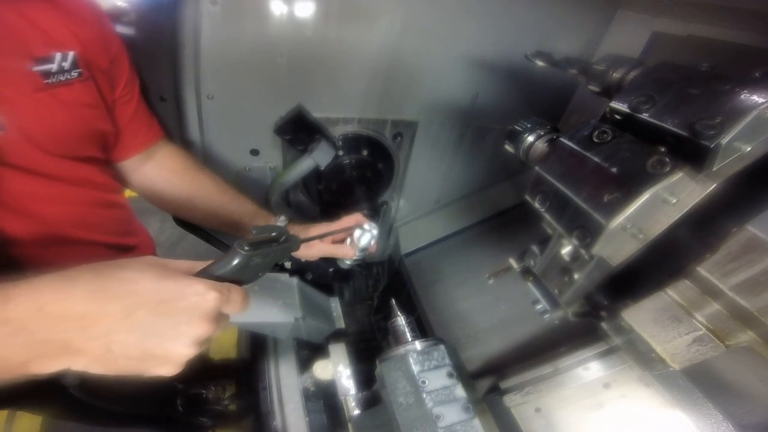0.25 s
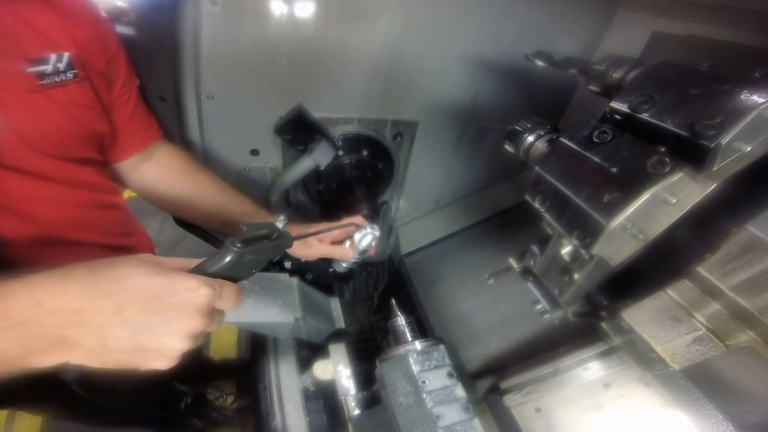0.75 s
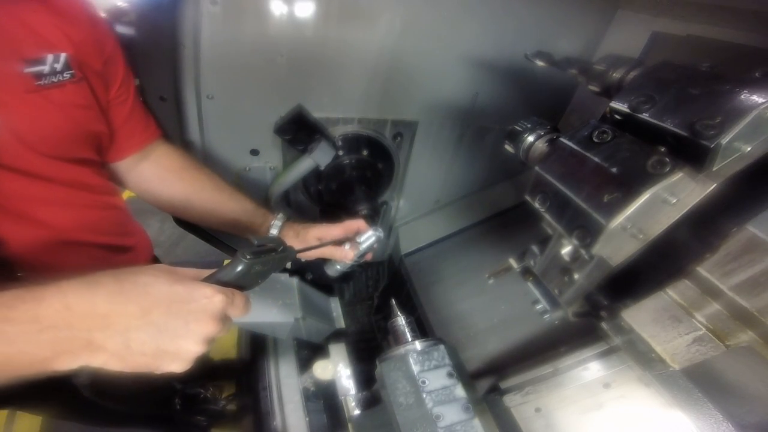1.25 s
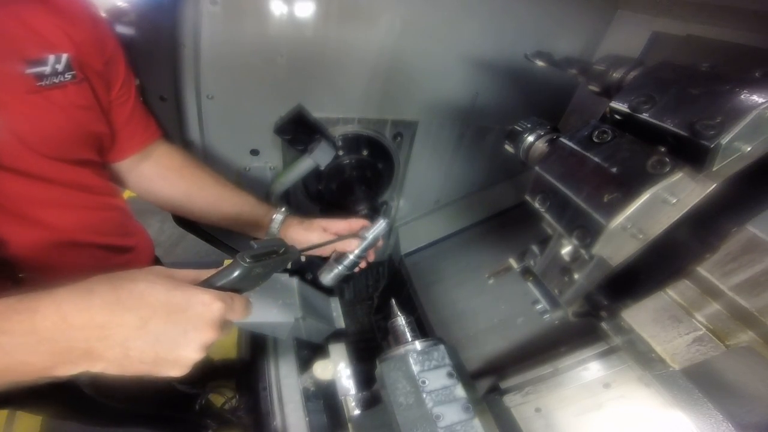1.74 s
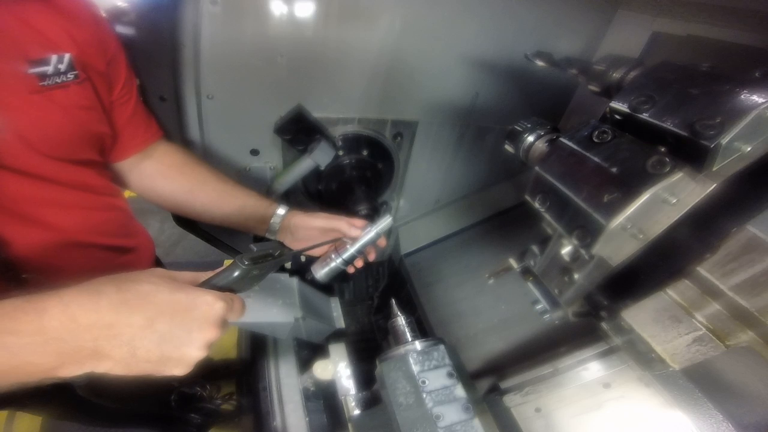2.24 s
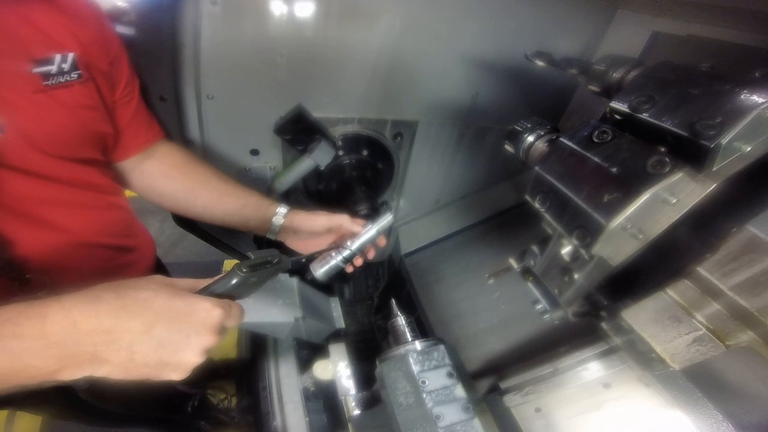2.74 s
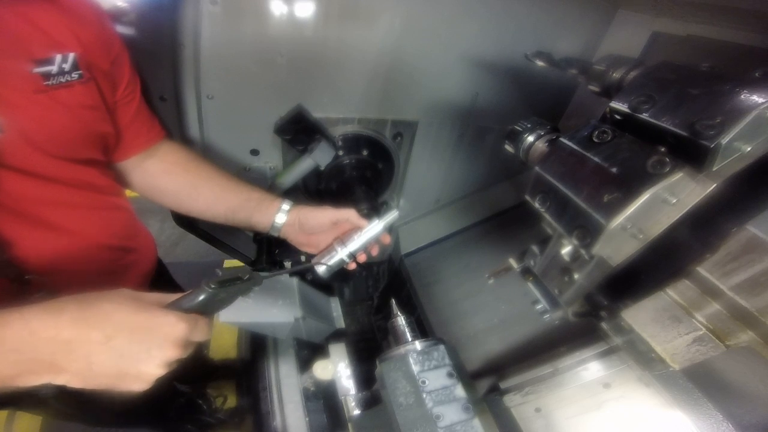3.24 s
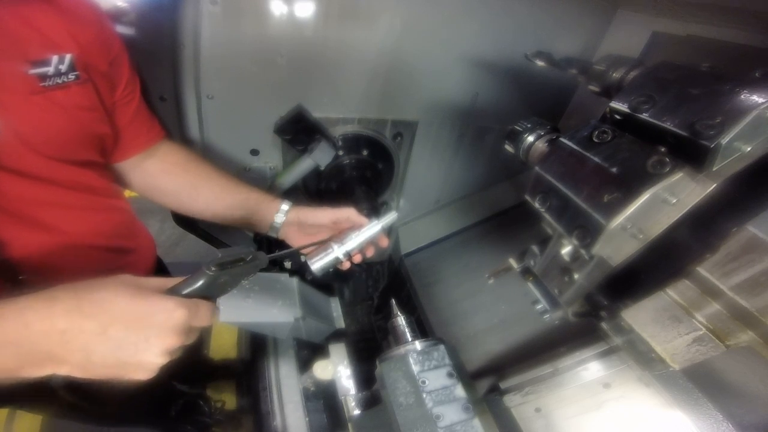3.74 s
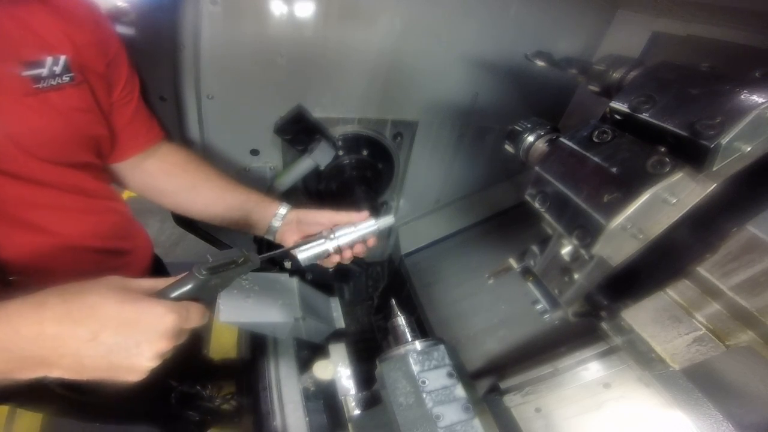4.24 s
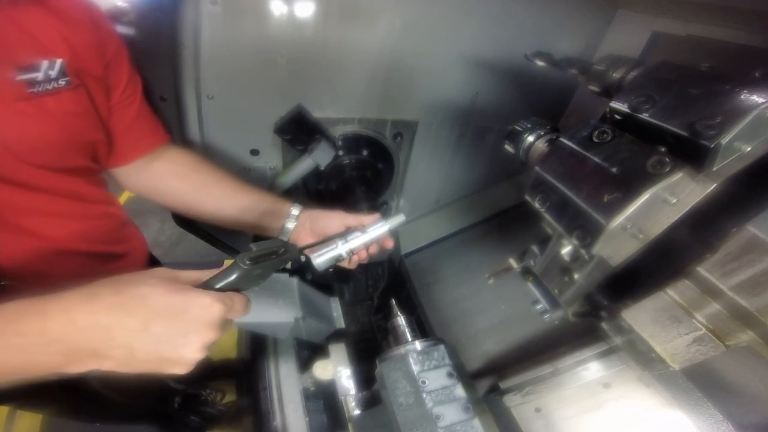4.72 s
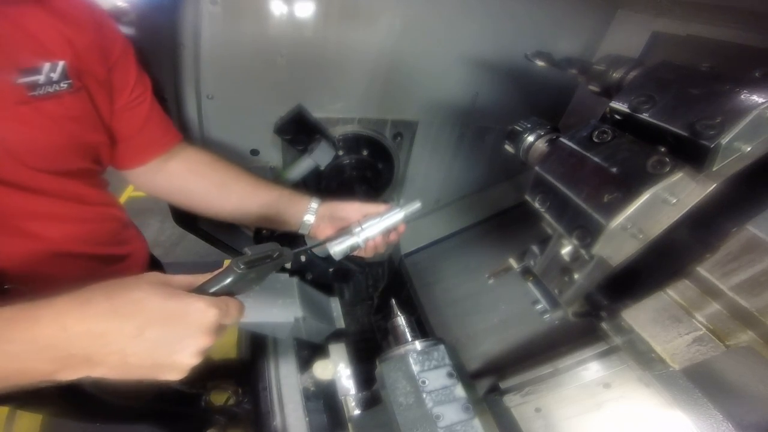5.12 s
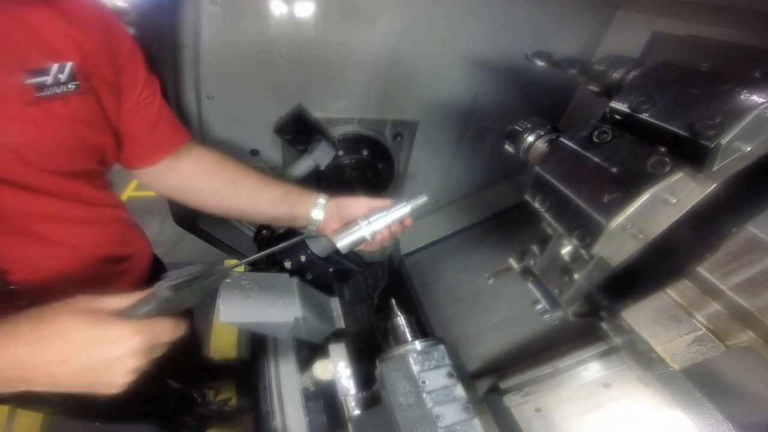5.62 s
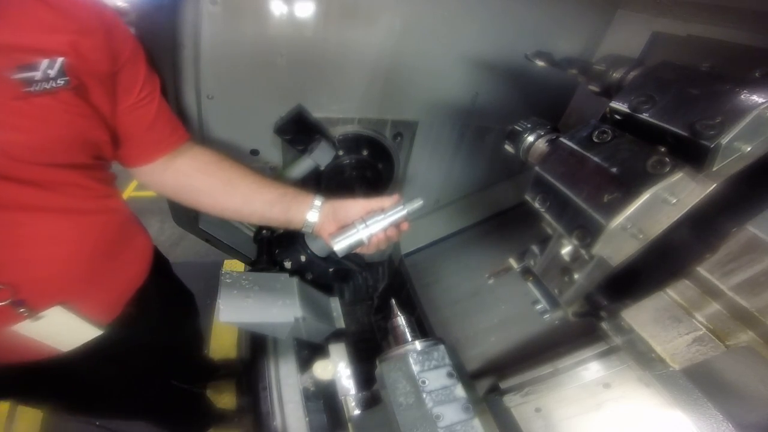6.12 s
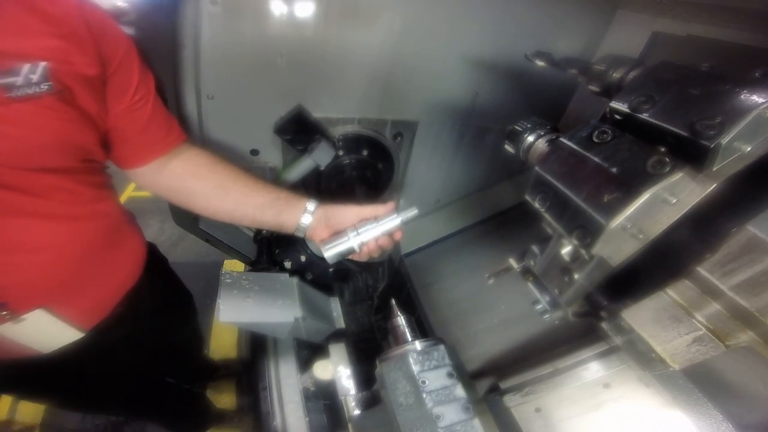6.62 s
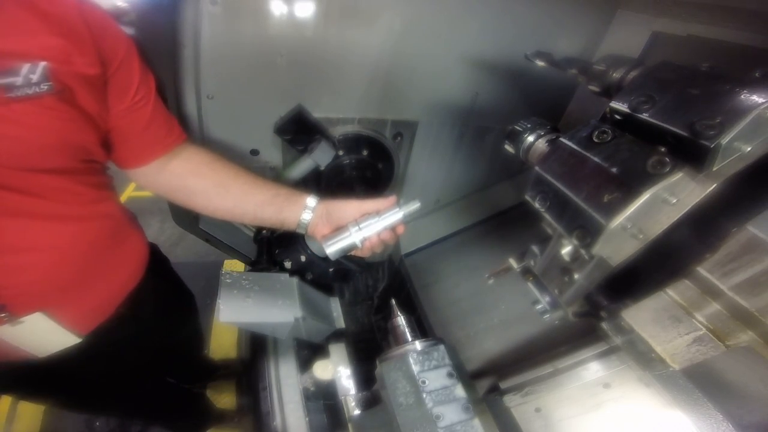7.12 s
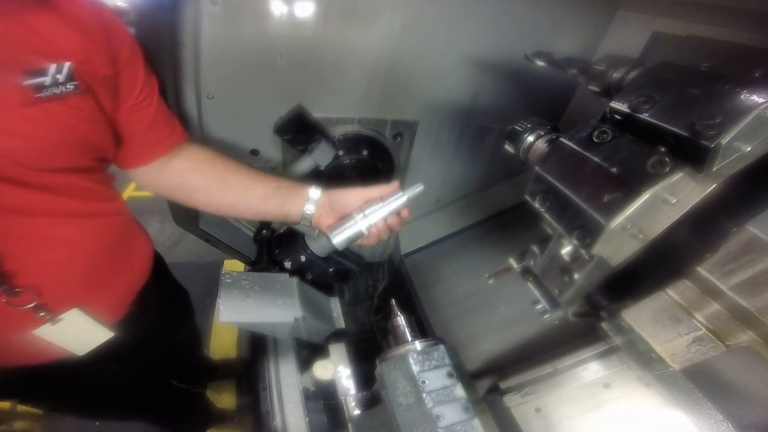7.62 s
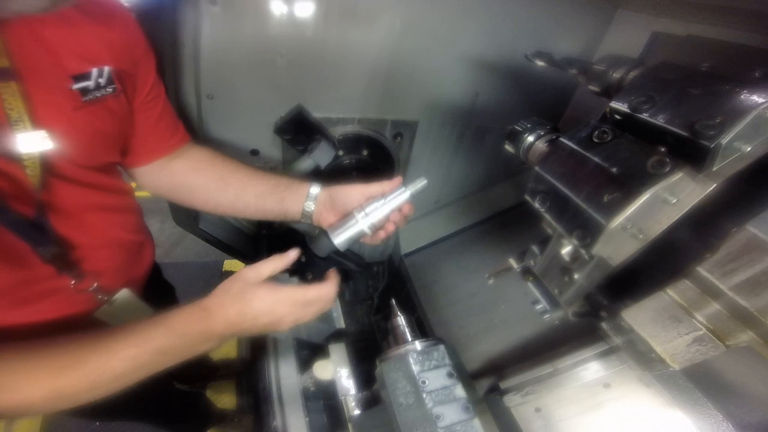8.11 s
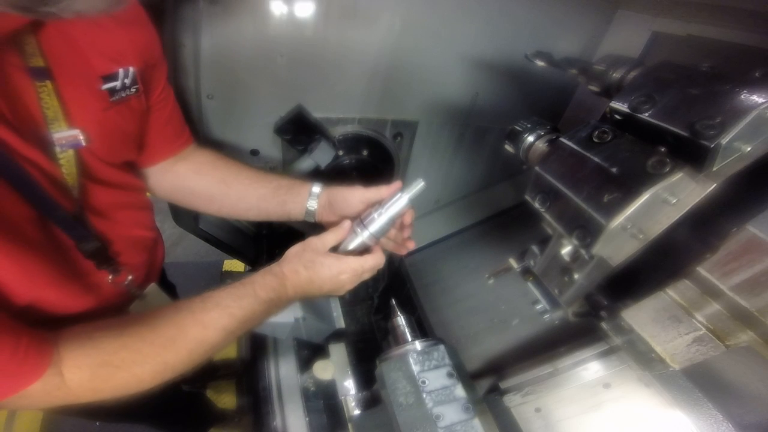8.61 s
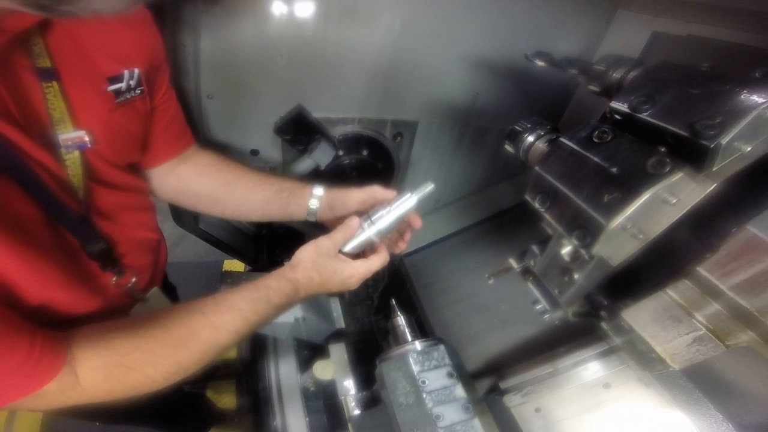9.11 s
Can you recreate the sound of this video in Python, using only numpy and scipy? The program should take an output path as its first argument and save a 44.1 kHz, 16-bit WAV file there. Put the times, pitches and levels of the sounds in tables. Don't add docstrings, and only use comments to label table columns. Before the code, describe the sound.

Two long compressed-air blasts hiss over a metal part inside a machine enclosure, then booming knocks, rattles and a small jingle over low hum.

```python
import sys
import numpy as np
from scipy import signal
from scipy.fft import rfft, irfft, next_fast_len
from scipy.io import wavfile
from scipy.ndimage import uniform_filter1d, minimum_filter1d, map_coordinates

SR = 44100
rng = np.random.default_rng(int(sys.argv[2]) if len(sys.argv) > 2 else 0)


def how_loud(loudness_db):
    steps = np.asarray(loudness_db, float) / 20
    return 10 ** steps


def persist_wave(psi):
    counts = np.round(np.clip(psi, -1, 1) * 32767).astype(np.int16)
    wavfile.write(sys.argv[1], SR, np.atleast_2d(counts).T)


N = 412776

# (frequency [Hz], level [dB per Hz])
CASE_COLOUR = [(500, -31), (900, -22), (1150, -19), (1360, -7.5), (1900, -9.5), (2900, -3.5), (4300, -9),
               (5000, -13.5), (5800, -3), (9300, -6), (9800, -9.5), (11800, -10.5), (12800, -17.5),
               (15200, -14.5)]
# (frequency [Hz], width [Hz], level [dB])
CASE_RESONANCES = [(730, 60, 2), (1500, 66, -9), (2600, 48, -8.5), (2740, 57, -6), (2707, 48, -2),
                   (2947, 15, 9.5), (3075, 40, 2.5), (3356, 46, -4), (3620, 73, -4), (4170, 120, 1),
                   (5935, 200, -2.5), (6280, 55, -10), (6660, 50, -11), (6900, 33, -5.5), (6800, 42, -7),
                   (8100, 68, -3), (7940, 67, -3.5), (8600, 38, -10), (9200, 120, -0.5), (13800, 250, -6)]
# (frequency [Hz], width [Hz], depth [0-1])
CASE_NOTCHES = [(1450, 50, 0.2), (1600, 31, .45), (1840, 30, 0.4), (2860, 70, .55), (3130, 46, .55),
                (4020, 130, 0.3), (5270, 200, 0.3)]
# (low edge [Hz], high edge [Hz])
JET_BANDS = [
    [(5100, 9600), (12500, 16000)],
    [(300, 2000)],
    [(2000, 5100)],
    [(9600, 12500)],
]
# (level [dB], share of aim [ratio], share of the closing [ratio])
JET_VOICES = [
    (0, 0.11, 0.96),
    (-15.5, 1.3, .7),
    (-3.5, 1.01, 0.82),
    (-7.5, -0.96, 1.2),
]
# (pulled [s], let go [s])
BLASTS = [
    (-.3, 1.804),
    (1.999, 5.716),
]
# (time [s], flow [dB], how squarely it points into the part [dB])
NOZZLE_AIM = [(0, -27.5, -2), (.7, -30, 0.5), (1.3, -29, -1), (1.8, -28.5, 1.5), (2.1, -26, -1),
              (2.3, -27.5, 1.5), (2.42, -29.5, 2), (2.8, -30.5, 3), (3.1, -29.5, 1.5), (3.25, -30.5, 1.5),
              (3.68, -30.5, 3.5), (3.95, -27.5, 1.5), (4.28, -25.5, 0.5), (4.5, -29, 0.5), (4.85, -26.5, 3),
              (5.4, -26, -1), (5.55, -26.5, -0.5), (5.72, -29, 3)]
# (time [s], lift [dB], length [s])
EDGE_PUFFS = [
    (0.283, 4.5, 0.018),
    (2.965, 7.5, 0.026),
    (3.808, 4.5, 0.025),
]
# (middle [s], length [s], lift [dB], pitch [octaves above 1 kHz])
GROOVE_SWEEPS = [(0.17, .13, 6.5, 3.6), (.29, 0.047, 8, 3.63), (0.455, .04, 5.5, 3.4),
                 (0.608, 0.11, 6.5, 3.44), (0.872, 0.083, 6.5, 3.57), (0.885, 0.15, -7, 0.16),
                 (1.018, 0.03, 9, 3.74), (1.052, 0.046, 7, 1.9), (1.2, 0.038, 3.5, 3.5),
                 (1.247, .07, 4.5, 0.81), (1.35, .05, 3.5, 4.1), (1.46, 0.17, 5, 2.1),
                 (1.6, 0.056, 3, 0.48), (2.33, .05, 4, 3.4), (2.887, 0.16, 2.5, 2.9),
                 (2.996, 0.031, 7, 1.4), (3.031, 0.049, 6.5, 2.8), (3.38, 0.092, 8, 1.67),
                 (3.524, 0.039, 11, 0.27), (3.526, 0.034, 6, 3.15), (3.695, .05, 5.5, 1.3),
                 (3.777, 0.13, 6.5, 3.1), (4.292, .06, 2, 1.3), (4.642, 0.1, 4, 3.3),
                 (4.65, 0.044, 3.5, 1.5), (5.015, .1, 6.5, 2.63), (5.157, 0.06, -4, 3),
                 (5.233, 0.056, 8.5, 1.2), (5.304, 0.2, 4, 2.43), (5.414, 0.1, 7, 0.97)]
# (frequency [Hz], t60 [s])
HALL_DECAY = [(500, 1.6), (3000, 1.9), (8000, 0.92), (15000, 0.21)]
# (frequency [Hz], level [dB rms])
HUM_TONES = [(55, -62), (192.8, -58), (256.2, -61), (360, -64), (386, -62), (771.6, -72), (1543, -75),
             (2702, -76)]
# (frequency [Hz], level [dB per Hz])
FAN_COLOUR = [(200, -15.5), (400, -16), (800, -21), (1150, -22), (1500, -20), (2450, -25), (2720, -20.5),
              (3100, -26.5), (3600, -28.5), (5000, -35), (5900, -33.5), (8200, -38), (11000, -45),
              (15300, -50)]
# (frequency [Hz], level [dB per Hz])
FLOOR_SHAKE = [(20, -25), (45, -15), (66, -17), (88, -2.5), (104, -7.5), (116, -9), (136, -17), (150, -3),
               (165, 0), (176, -3), (184, -20.5), (205, -22), (300, -36.5)]
# (frequency [Hz], t60 [s])
MOUNT_MODES = [
    (88.6, 0.31),
    (158.4, 0.13),
    (121.8, 0.19),
]
# (frequency [Hz], level [dB], t60 [s])
PANEL_MODES = [(238, 8.5, 0.12), (317, -2.5, 0.13), (381, -12, 0.3), (517, -27.5, .08)]
# (time [s], peak [dB], low over high mode [dB], middle mode [dB])
HOSE_SWAYS = [(6.327, -47, -4, 18), (6.373, -19.5, -22, -10), (6.428, -29.5, 0.5, 1),
              (6.597, -33.5, 10, -6), (6.782, -19.5, -11, -2.5), (6.87, -32.5, -10, -4),
              (7.478, -11.5, -4, -17), (7.691, -12, 10, -4), (7.878, -16, -1, -5), (7.999, -35, 20, 4),
              (8.146, -13, -17, -24), (8.209, -25.5, 0, -21), (8.269, -31.5, 7, -13),
              (8.658, -34, -11, -14)]
# (time [s], peak [dB], low over high mode [dB], middle mode [dB], panel [dB])
HARD_KNOCKS = [(6.533, -24, -1, -12, -24), (6.735, -7.5, -17, -11, -9), (6.812, -20, -8.5, 0.5, -15),
               (7.24, -3.5, -0.5, -7, -14.5), (7.268, 4, -8, -15, -33), (7.307, -17, -5.5, -10, -15),
               (7.374, -8, 5.5, -17, -15.5), (7.418, 1.5, -15, -23, -14.5), (7.552, -22, 3, -7, -11),
               (7.621, 2.5, -11, -13, -29), (7.739, -11.5, 0, -9, -16), (7.807, -4.5, -21, -13.5, -26),
               (7.85, -19, -1, -14, -19)]
# (frequency [Hz], width [Hz], level [dB])
FRAME_MODES = [(484, 150, 14), (745, 52, -3.5), (995, 120, 1), (1424, 60, 2.5), (1546, 57, -5.5),
               (1790, 35, -9.5), (2050, 44, -13), (2200, 66, -7), (2270, 42, -8), (2510, 42, -4),
               (2690, 50, -9), (3320, 90, -12.5), (3650, 60, -17), (4250, 71, -14)]
# (time [s], peak [dB], centre [Hz], dull part [dB], length [s])
FRAME_RATTLES = [(6.535, -51, 2400, 24, 0.0087), (6.737, -32.5, 2370, 0, 0.017),
                 (6.774, -47.5, 1600, 6.5, 0.02), (7.236, -28.5, 1910, -14, 0.022),
                 (7.276, -41.5, 2200, 12.5, 0.015), (7.37, -35, 1930, -9, 0.022),
                 (7.406, -44, 1500, 14.5, .008), (7.413, -37, 1900, -2.5, 0.018),
                 (7.434, -46, 1500, 20, .012), (7.627, -50.5, 1500, 13, .02), (7.734, -50.5, 1450, -1, .02),
                 (7.797, -47, 1500, 4, .012), (7.849, -58.5, 1500, 15, .015)]
# (time [s], level [dB], length [s])
FITTING_SNAPS = [
    (7.411, -53, .002),
    (7.438, -27, 0.0029),
    (7.469, -51, .002),
    (7.752, -51, 0.0018),
]
# (frequency [Hz], width [Hz], level [dB])
COUPLING_MODES = [(1026, 60, -4), (2320, 130, 1), (2600, 160, 0.5), (3300, 89, -5), (3630, 80, -11),
                  (4270, 100, -17), (5940, 200, -4), (7550, 200, -5), (8500, 250, -7), (9300, 180, -13),
                  (11500, 330, -22)]
# (time [s], level [dB], tilt [dB per 5 kHz], length [s])
COUPLING_TICKS = [
    (7.550, -49, -1, 0.017),
    (7.613, -40, -2.5, 0.043),
    (7.758, -53, -3, .025),
    (7.825, -46.5, -7.5, 0.023),
    (8.145, -58.5, -11, .025),
]


def unit(x):
    return x / np.sqrt(np.mean(x ** 2) + 1e-20)


def along(points, hz):
    f, value = np.transpose(points)
    return np.interp(np.log(hz + 1), np.log(f + 1), value)


def wobble(rate):
    coarse = np.arange(0, N + 32, 32)
    knots = rng.standard_normal(int(N * rate / SR) + 4)
    return np.interp(np.arange(N), coarse, map_coordinates(knots, [coarse * rate / SR]))


def filtered(x, response):
    m = next_fast_len(N + SR // 2)
    return irfft(rfft(x, m) * response(np.fft.rfftfreq(m, 1 / SR)), m)[..., :N]


def rush(response, patchy_db):
    z = signal.stft(rng.standard_normal(N), nperseg=512)[2]
    patches = uniform_filter1d(rng.standard_normal(z.shape), size=5, axis=0)
    patches = uniform_filter1d(patches, size=10, axis=1)
    noise = signal.istft(z * how_loud(patchy_db * unit(patches)), nperseg=512)[1][:N]
    return unit(filtered(noise, response))


def band(hz, lo_hz, hi_hz):
    return 1 / np.sqrt((1 + (lo_hz / (hz + 1)) ** 12) * (1 + (hz / hi_hz) ** 12))


def case(hz):
    lift = sum(how_loud(db) * w * w / (w * w + 4 * (hz - c) ** 2) for c, w, db in CASE_RESONANCES)
    dips = np.prod([1 - depth * w * w / (w * w + 4 * (hz - c) ** 2) for c, w, depth in CASE_NOTCHES], axis=0)
    return how_loud(along(CASE_COLOUR, hz)) * (1 + 0.59 * lift) * dips


def valve(t, closing_share):
    open_s, shut_db_per_s2 = 0.043, 3300
    flow = np.zeros(N)
    for pulled, let_go in BLASTS:
        opening = 1 - np.exp(-np.maximum(t - pulled, 0) / open_s)
        closing_db = -closing_share * shut_db_per_s2 * np.maximum(t - let_go, 0) ** 2
        flow += opening * how_loud(closing_db)
    return flow


def jet():
    t, out = np.arange(N) / SR, np.zeros(N)
    layers = [rush(lambda hz: case(hz) * sum(band(hz, *edges) for edges in bands), patchy_db=0.18)
              for bands in JET_BANDS]
    flutter = how_loud(0.31 * wobble(25) + 0.47 * wobble(70))
    aim_s, flow_db, aim_db = np.transpose(NOZZLE_AIM)
    for layer, (db, aim_share, closing_share) in zip(layers, JET_VOICES):
        nozzle_db = np.interp(t, aim_s, flow_db + aim_share * aim_db)
        out += valve(t, closing_share) * how_loud(db + nozzle_db) * layer
    for s, lift_db, length in EDGE_PUFFS:
        flutter *= how_loud(lift_db * np.exp(-((t - s - length / 2) / length * 2) ** 2))
    return sweeps(out * flutter)


def sweeps(x):
    hz, t, z = signal.stft(x, SR, nperseg=512)
    middle, length, lift_db, octave = np.transpose(GROOVE_SWEEPS)[..., None]
    reach_oct = 1 - 0.13 * octave
    when = np.exp(-((t - middle) / length * 2) ** 2)
    where = np.exp(-((np.log2((hz + 1) / 1000) - octave) / reach_oct) ** 2)
    return signal.istft(z * how_loud(where.T @ (lift_db * when)), SR, nperseg=512)[1][:N]


def enclosure(x):
    t, hop = np.arange(SR // 4) / SR, SR // 6
    x, out = np.pad(x, (hop, 2 * hop)), np.zeros(N + 5 * hop)
    fade = np.sin(np.pi * np.arange(2 * hop) / (2 * hop))
    for at in range(0, N + hop, hop):
        ring = rng.standard_normal(len(t)) * how_loud(-60 * t / .1) * (t > .002)
        heard = signal.fftconvolve(fade * x[at:at + 2 * hop], ring / np.linalg.norm(ring))
        out[at:at + len(heard)] += heard
    return out[hop:hop + N]


def hall(x):
    hz, t, z = signal.stft(rng.standard_normal(2 * SR), SR, nperseg=256)
    tail = signal.istft(z * how_loud(-60 * t / along(HALL_DECAY, hz)[:, None]), SR, nperseg=256)[1]
    return signal.fftconvolve(x, tail / np.linalg.norm(tail))[:N]


def shop():
    t, tones = np.arange(N) / SR, np.zeros(N)
    for hz, db in HUM_TONES:
        level = np.sqrt(2) * how_loud(db + 1.1 * wobble(4.5))
        tones += level * np.sin(2 * np.pi * hz * t + 0.54 * wobble(3.2))
    mains = how_loud(-35.5 + 0.38 * wobble(3.7)) * np.sin(2 * np.pi * 119.95 * t + 0.076 * wobble(9.1))
    fans = how_loud(-55.5) * rush(lambda hz: how_loud(along(FAN_COLOUR, hz)), patchy_db=0.6)
    shake = rush(lambda hz: how_loud(along(FLOOR_SHAKE, hz)) * (hz < 400), patchy_db=-2.5)
    return tones + mains + fans + how_loud(-43 + 1.3 * wobble(2.2)) * shake


def knocks():
    out, t = np.zeros(N + SR), np.arange(SR // 2) / SR
    sway_panel_db = -33
    push_s = 0.01334
    blows = sorted(HARD_KNOCKS + [(*row, sway_panel_db) for row in HOSE_SWAYS])
    chance = rng.uniform(-1.13, 1, (len(blows), len(MOUNT_MODES) + len(PANEL_MODES)))
    for (s, db, lean_db, middle_db, panel_db), luck in zip(blows, chance):
        mount_db = min(lean_db, 0), min(-lean_db, 0), middle_db
        modes = [(hz, mode_db + 9.5, t60) for (hz, t60), mode_db in zip(MOUNT_MODES, mount_db)]
        modes += [(hz, panel_db + mode_db - 5.0, t60) for hz, mode_db, t60 in PANEL_MODES]
        for (hz, mode_db, t60), u in zip(modes, luck):
            build = 1 - np.exp(-(t * hz / 1.49) ** 2)
            swing = how_loud(db + mode_db - 60 * t / t60) * build
            phase = 2 * np.pi * hz * (1 + 0.021 * u) * (t - push_s) + 0.46 * u
            out[round(s * SR):][:len(t)] += swing * np.cos(phase)
    return out[:N]


def ringing(hz, modes):
    return sum(how_loud(db) / (1 + (2 * (hz - c) / w) ** 2) for c, w, db in modes)


def tinted(response):
    n = SR // 4
    return unit(irfft(rfft(rng.standard_normal(n)) * response, n))


def scrape(t, length):
    return (1 - np.exp(-t / 0.0012)) * how_loud(-5 * t / length - 500 * np.maximum(t - length, 0))


def rattles():
    out, t = np.zeros(N + SR), np.arange(SR // 4) / SR
    hz = np.fft.rfftfreq(len(t), 1 / SR)
    frame = ringing(hz, FRAME_MODES)
    coupling = 0.17 * band(hz, 1800, 11000) + ringing(hz, COUPLING_MODES)
    for s, db, centre_hz, dull_db, length in FRAME_RATTLES:
        body = tinted((0.19 + frame) * band(hz, 900, 5600) / (1 + ((hz - centre_hz) / 900) ** 2))
        bright = tinted(band(hz, 5500, 10000) * case(hz) * how_loud(-hz / 900))
        dull = tinted(frame * band(hz, 330, 1250))
        burst = body + how_loud(-29) * bright + how_loud(dull_db) * dull
        out[round(s * SR):][:len(t)] += how_loud(db) * scrape(t, length) * burst
    for s, db, length in FITTING_SNAPS:
        snap = tinted(band(hz, 900, 7600) * how_loud(-hz / 280) + .003 * band(hz, 900, 10500))
        out[round(s * SR):][:len(t)] += how_loud(db - 8000 * np.maximum(t - length, 0)) * snap
    for s, db, tilt_db, length in COUPLING_TICKS:
        jingle = tinted(coupling * how_loud(tilt_db * hz / 5000))
        out[round(s * SR):][:len(t)] += how_loud(db) * scrape(t, length) * jingle
    return out[:N]


def scene():
    thumps, blast, handling = knocks(), jet(), rattles()
    near = 0.89 * blast + 0.4 * enclosure(blast) + handling + how_loud(-25.5) * enclosure(handling)
    mono = near + how_loud(-26.0) * hall(near) + shop() + thumps
    return np.array([mono, mono])


def roll_off(x):
    return signal.sosfilt(signal.butter(12, 15990, fs=SR, output="sos"), x)


def record(dry):
    threshold_db, recovery_s, top_hz = -15.5, .35, 15310
    level_db = 10 * np.log10(np.abs(uniform_filter1d(dry[0] ** 2, size=1500)) + 1e-9)
    over_db = np.maximum(level_db - threshold_db, 0)
    keep = np.exp(-1 / (recovery_s * SR))
    duck_db = signal.lfilter([1 - keep], [1, -keep], over_db)
    x = dry * how_loud(-1.6 * duck_db)
    needed = np.minimum(1, .91 / (np.abs(x[0]) + 1e-9))
    x = x * uniform_filter1d(minimum_filter1d(needed, size=600), size=600)
    x = filtered(x, lambda hz: np.clip((top_hz - hz) / 60, 0, 1))
    return roll_off(x)


dry = scene()
out = record(dry)
persist_wave(out)
```